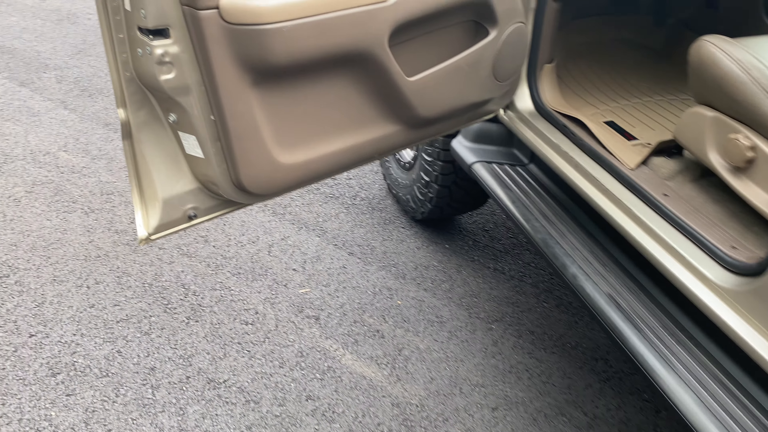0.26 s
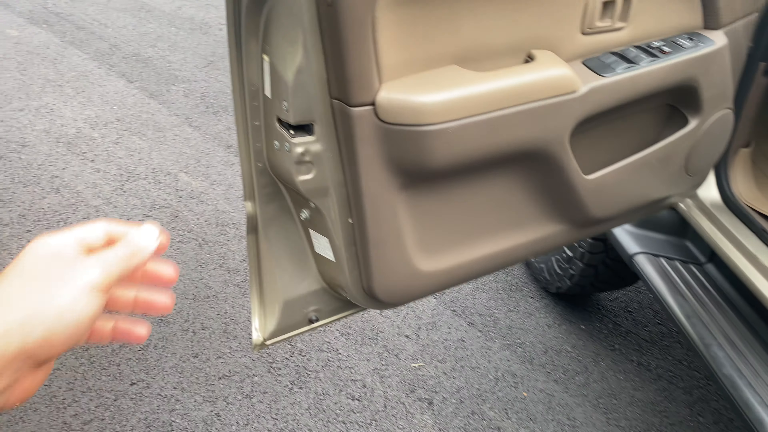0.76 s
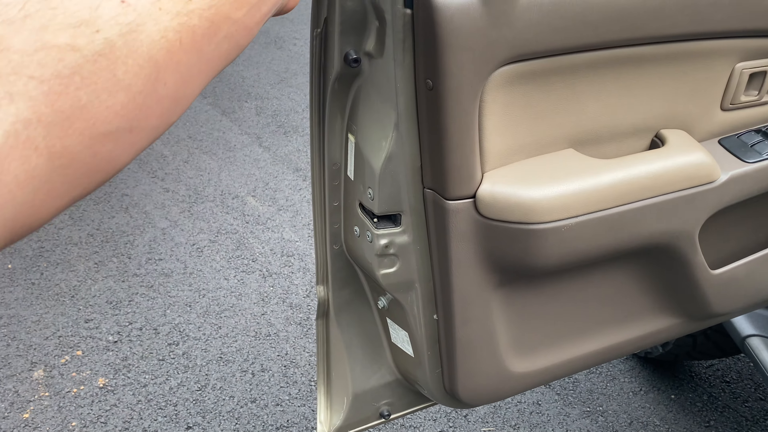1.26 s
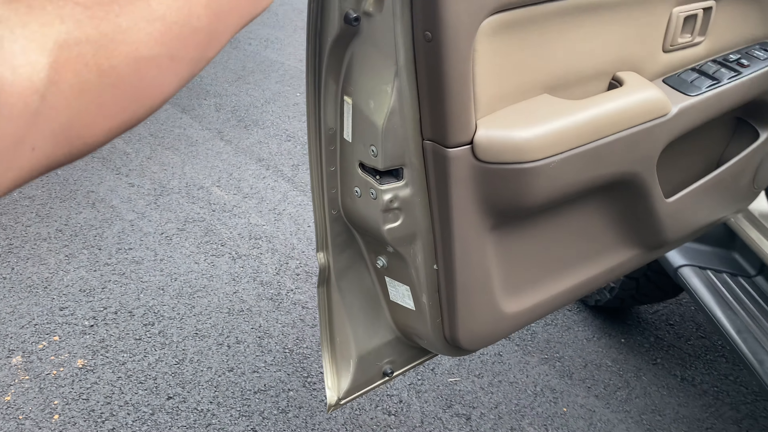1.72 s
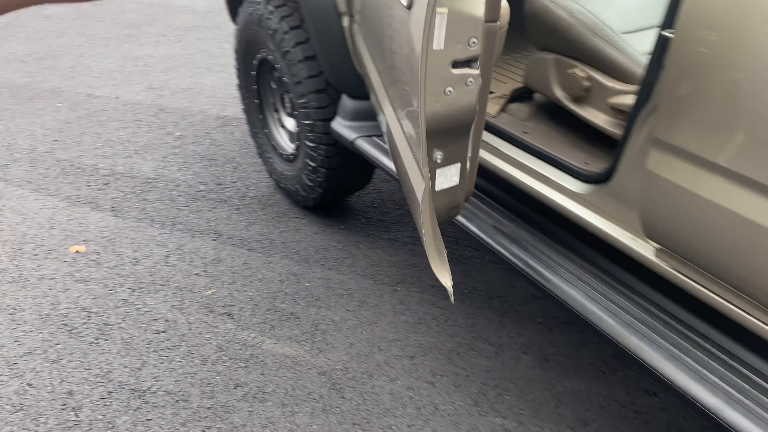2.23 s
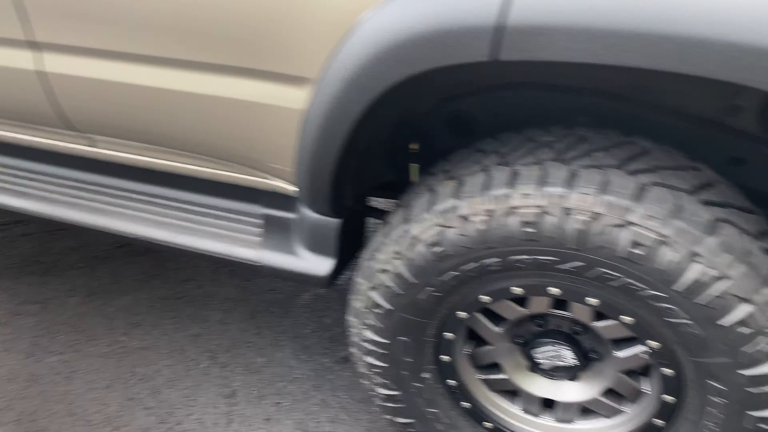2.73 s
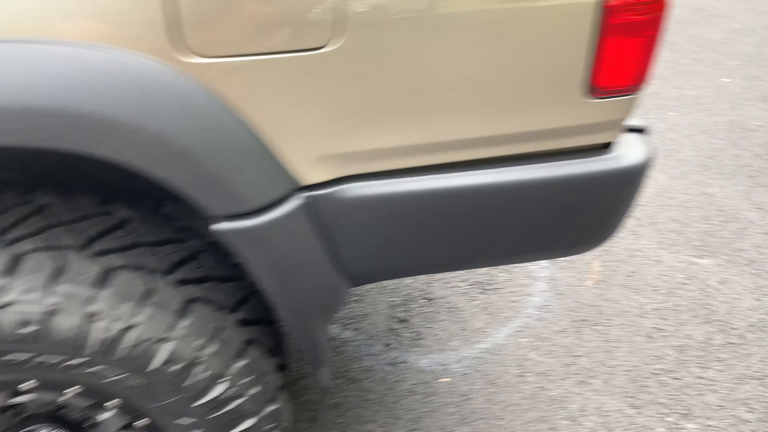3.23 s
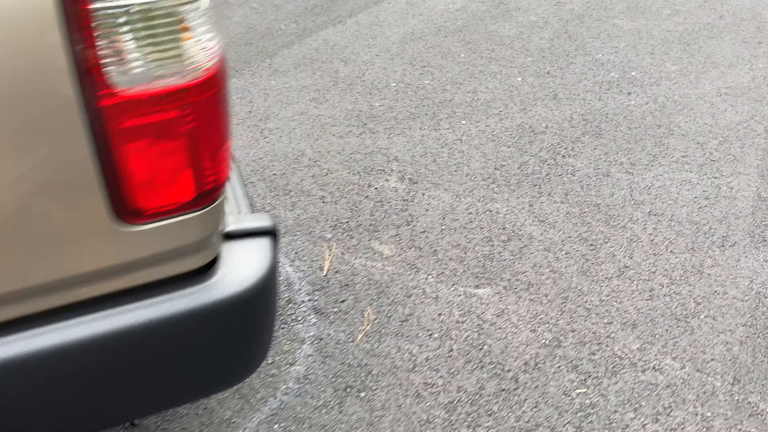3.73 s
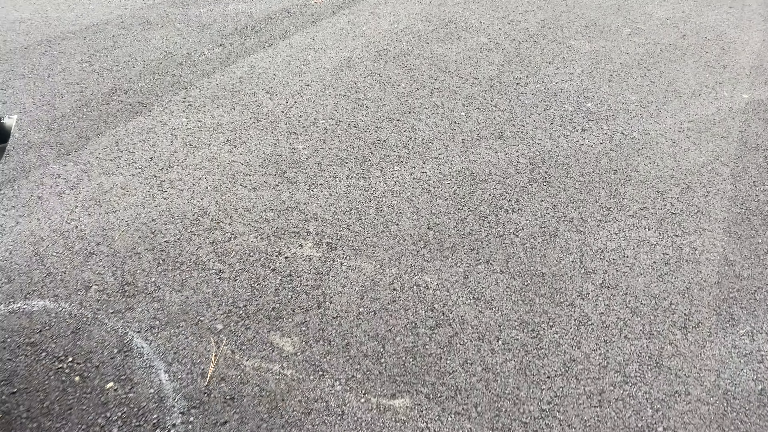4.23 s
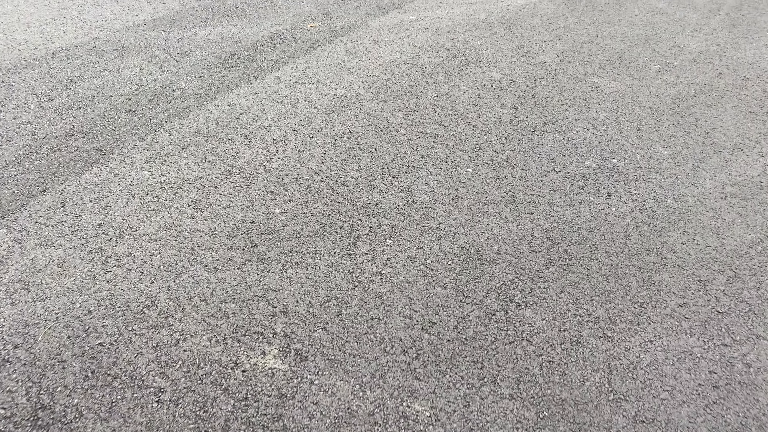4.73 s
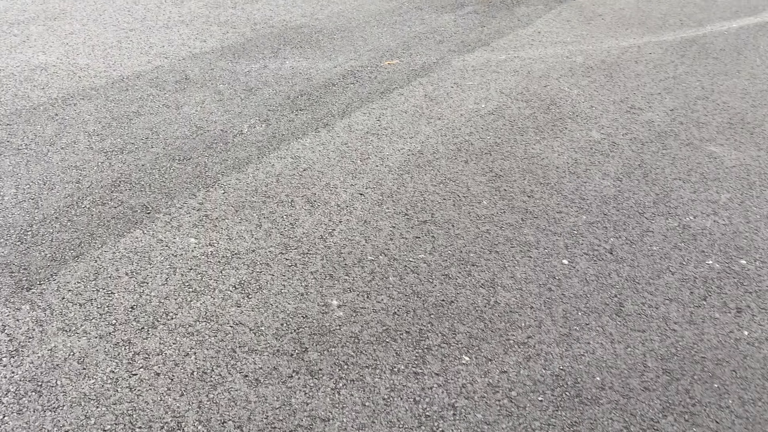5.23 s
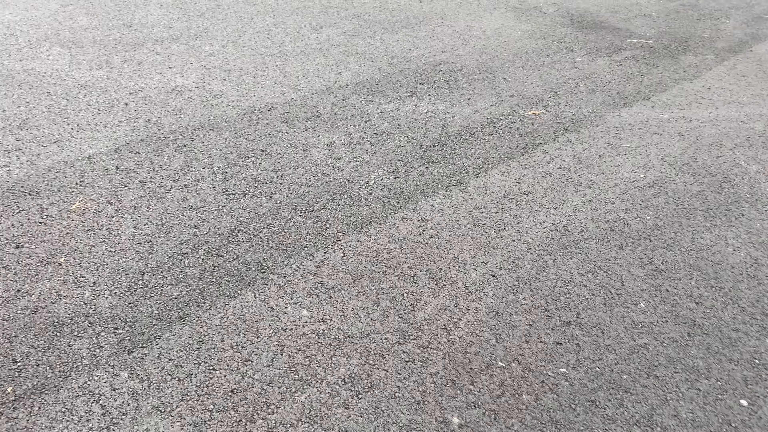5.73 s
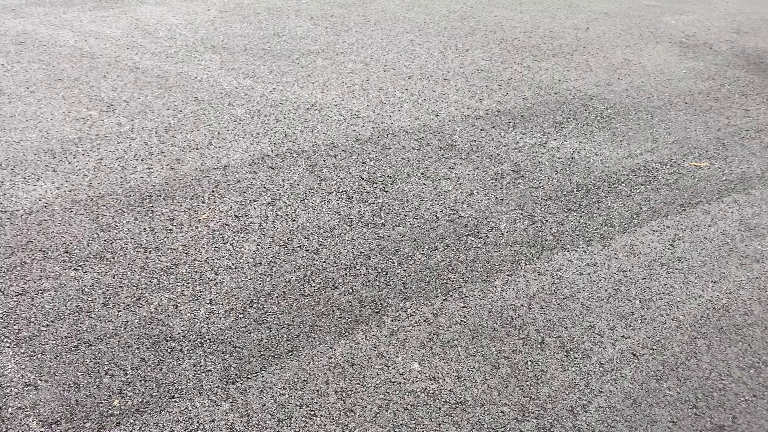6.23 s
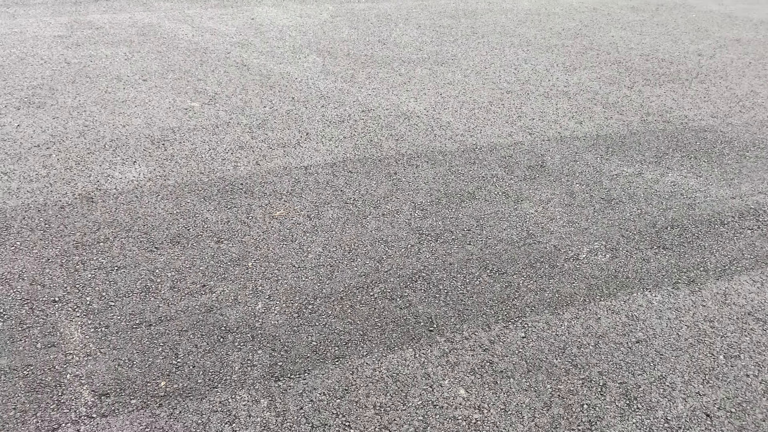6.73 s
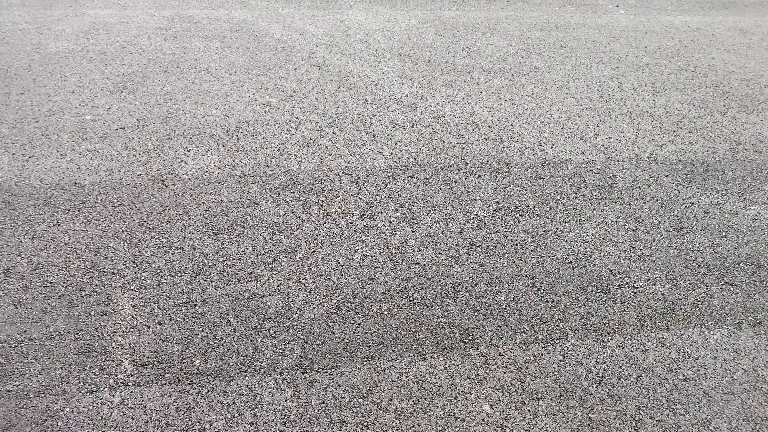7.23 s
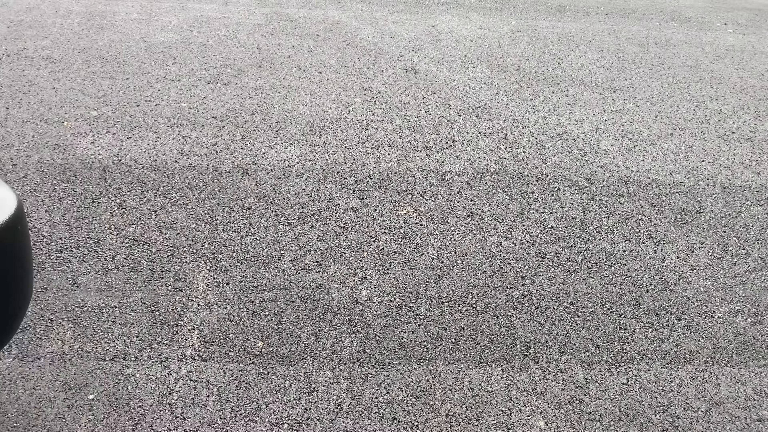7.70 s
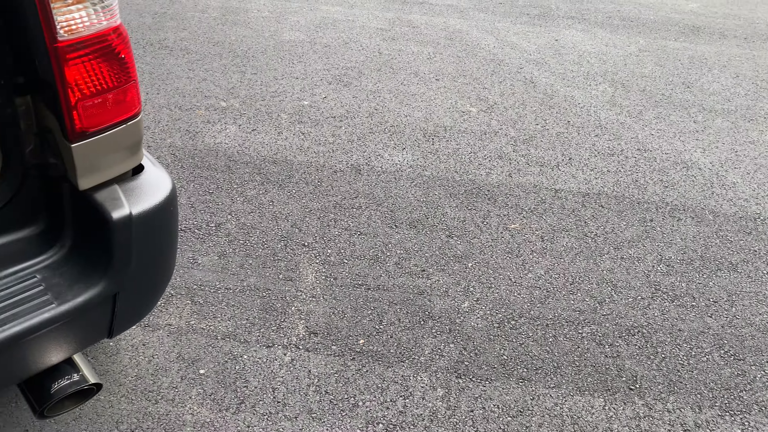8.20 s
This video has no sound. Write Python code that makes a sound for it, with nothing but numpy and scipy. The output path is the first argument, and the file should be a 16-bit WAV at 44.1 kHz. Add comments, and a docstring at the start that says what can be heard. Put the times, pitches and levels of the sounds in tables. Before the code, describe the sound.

A walk around an off-road vehicle on quiet asphalt. First comes a strong door slam with a deep cabin thump and short panel ring, then tiny hinge creaks and a softer, duller door closing. Gusts rumble on the nearby stereo microphones during a pause with faint scuffing steps. A crisp, bright latch clack follows, then small rattly knocks, over low breeze and distant air noise.

```python
"""A walk around a parked off-road car on a quiet drive, with a pair of microphones in the open air.
Throughout, a breeze rumbles and flutters as shaped noise over a faint hush and a distant machine hum.
First one door slams; then the front door's hinge creaks and it is swung shut; last, after a few shoe scuffs,
the tailgate latch pops and the gate knocks as it lifts. Each is a quick run of contacts that ring decaying
sines and noisy clatter; short noise bursts make snaps and scuffs, low sines the cabin thumps."""
import sys
import numpy as np
from scipy import signal
from scipy.fft import rfft, irfft, next_fast_len
from scipy.io import wavfile
from scipy.ndimage import uniform_filter1d, map_coordinates

SR = 44100
rng = np.random.default_rng(int(sys.argv[2]) if len(sys.argv) > 2 else 0)


def file_out(sig):
    """Save sig as 16-bit WAV at sys.argv[1]."""
    # one column per channel
    cols = np.atleast_2d(sig).T
    # limit, then scale
    lim = np.clip(cols, -1, 1)
    pcm = np.round(lim * 32767).astype(np.int16)
    wavfile.write(sys.argv[1], SR, pcm)


N = 373086
RING = np.arange(SR // 2) / SR  # time axis of one blow, in seconds
CONTACT_RISE_S = .001  # time constant of a contact's build-up

# how long the tailgate's clatter lasts, before each contact's length share: pitch_hz, t60_s
TAILGATE_DECAY = [(250, 0.17), (1000, 0.11), (4000, .11), (12000, 0.042)]
# how alike the tailgate's clatter is at both microphones: pitch_hz, left_right_likeness (-1 to 1)
TAILGATE_ALIKE = [(150, .8), (500, 0.9), (1500, 0.51), (4000, .45), (10000, -0.024)]


def amp(db):
    """Decibels to gain."""
    return 10 ** (np.asarray(db) / 20)


def unit(x):
    """Scaled to rms 1."""
    return x / np.sqrt(np.mean(x ** 2) + 1e-20)


def along(points, hz):
    """(Hz, value) points read on a log frequency axis."""
    point_hz, values = np.transpose(points)
    return np.interp(np.log(hz + 1), np.log(point_hz + 1), values)


def curves(rows):
    """One value per sample for each column after the time."""
    times, *columns = np.transpose(rows)
    return [np.interp(np.arange(N) / SR, times, column) for column in columns]


def add(track, s, sound):
    """Lay a sound into the track at time s, cut at the track's end."""
    room = track[:, round(s * SR):][:, :sound.shape[-1]]
    room += sound[..., :room.shape[-1]]


def pan(left_db):
    """Gains of both channels for a left-over-right level difference."""
    return amp([[left_db / 2], [-left_db / 2]])


def fade(t60, rise):
    """Envelope of one blow: a quick build-up and an exponential decay, both in seconds."""
    decay = 1000 ** (-RING / max(t60, 1e-3))
    build_up = 1 - np.exp(-RING / max(rise, 1e-5))
    return decay * build_up


def noise(colour_db, alike, size):
    """Stereo noise of rms 1 with a given spectrum and left-right likeness."""
    m = next_fast_len(size)
    hz = np.fft.rfftfreq(m, 1 / SR)
    # the balance of mid and side sets the correlation of left and right
    turn = np.arccos(np.clip(along(alike, hz), -1, 1)) / 2
    spectra = rfft(rng.standard_normal((2, m))) * amp(colour_db(hz))
    mid, side = irfft(spectra * [np.cos(turn), np.sin(turn)], m)[:, :size]
    return unit(np.array([mid + side, mid - side]))


def even(x, seconds):
    """Noise with its slow chance swells levelled out."""
    power = uniform_filter1d(np.mean(x ** 2, axis=0), max(round(seconds * SR), 1))
    return x / np.sqrt(np.abs(power) + .02)


def wobble(rate):
    """A smooth random curve, rate knots a second."""
    return map_coordinates(rng.standard_normal(size=512), [np.arange(N) * rate / SR], mode="mirror")


def die_away(x, decay, length, rise):
    """Each octave of x fades at its own speed, its t60 multiplied by length."""
    hz = np.fft.rfftfreq(len(RING), 1 / SR)
    centres = np.geomspace(125, 16000, 8)
    spectrum = rfft(x)
    out = 0
    for centre, one in zip(centres, np.eye(len(centres))):
        share = along(np.c_[centres, one], hz)  # overlapping octave bands that sum to one
        band = irfft(spectrum * share, len(RING))
        out = out + band * fade(along(decay, centre) * length, rise)
    return out


def bursts(rows, alike, rise):
    """Short noise rings, each around one pitch: (s, dB, Hz, width in octaves, t60 s)."""
    out = np.zeros((2, N))
    for s, db, centre_hz, width, t60 in rows:
        octaves = lambda hz: np.log2((hz + 1) / centre_hz)
        band_db = lambda hz: -20 * np.log10(1 + (octaves(hz) / width) ** 2) - 2 * octaves(hz) ** 2
        ring = noise(band_db, alike, size=len(RING))
        add(out, s, amp(db) * ring * fade(t60, rise))
    return out


def hush():
    """Far traffic and leaf hiss: one noise colour, parted low and high at a crossover."""
    # slow levels of both layers before their weights: at_s, far_traffic_db, leaf_hiss_db
    levels = [(0.0, -69.5, -72), (1.58, -71, -72.5), (2.73, -68, -71.5), (3.98, -68, -73), (5.28, -69, -73),
              (6.46, -67, -72), (6.76, -68.5, -73), (8.46, -67, -74)]
    # colour of the open air, before the crossover: pitch_hz, level_db_per_hz
    air_colour = [(100, -12.5), (170, -2.5), (198, -3), (235, -1), (263, -4.5), (289, -5.5), (360, -9.5),
                  (464, -10), (745, -10), (1090, -9.5), (1150, -9.5), (1240, -12), (1560, -13),
                  (10800, -25.5), (14600, -34), (15700, -35.5)]
    # how alike the air is at both microphones: pitch_hz, left_right_likeness
    air_alike = [(60, 0.78), (150, 0.25), (380, 0.62), (950, 0.68), (2380, 0.49), (5980, 0.32),
                 (15000, 0.2)]
    traffic_weight_db, leaves_weight_db = 2.5, 2
    crossover_hz = 2700
    cut_db = lambda ratio: -10 * np.log10(1 + ratio ** 4)
    low_db = lambda hz: along(air_colour, hz) + cut_db(hz / crossover_hz)
    high_db = lambda hz: along(air_colour, hz) + cut_db(crossover_hz / (hz + 1))
    traffic_db, leaves_db = curves(levels)
    traffic = amp(traffic_db + traffic_weight_db) * noise(low_db, air_alike, size=N)
    leaves = amp(leaves_db + leaves_weight_db) * noise(high_db, air_alike, size=N)
    return pan(1.0) * traffic + pan(0.64) * leaves


def hum():
    """A distant machine's unsteady lines: noise in narrow resonance-shaped peaks."""
    # slow level of the whole hum: at_s, level_db
    levels = [(0, -73.5), (1.2, -67), (3.3, -67.5), (4.5, -73.5), (5.5, -70.5), (8.46, -78.5)]
    # lines of the machine, levels relative to one another: pitch_hz, level_db, width_hz
    lines = [(114.8, 2, 6.6), (240.9, -3, 5), (299.4, -9.5, 10), (1160, -15, 7)]
    peak = lambda hz, c, db, width: amp(db) / np.sqrt(width) / (1 + (2 * (hz - c) / width) ** 2)
    lines_db = lambda hz: 20 * np.log10(sum(peak(hz, *line) for line in lines))
    steady = even(noise(lines_db, [(100, 0.76)], size=N), seconds=0.61)
    return amp(curves(levels)[0]) * steady


def breeze():
    """Gusts swell and drop over the draught, buffeting the microphones and fluttering in lumps at their ports."""
    # light air that never stops, before its wander: at_s, buffet_db, flutter_db
    draught = [(0, -50.5, -66.5), (1.4, -49.5, -67), (3.4, -52, -60.5), (4.5, -49, -62.5), (6.6, -45, -60),
               (8.46, -44, -62)]
    # gusts on the microphones, flutter before its lumps:
    # peak_s, buffet_db, half_length_s, flutter_db (against the buffet)
    gusts = [(0.877, -46, 0.059, -19), (2.1, -44, 0.28, -19), (4.87, -38.5, 0.1, -24),
             (5.306, -33, .06, -37), (5.49, -33.5, .1, -15.5), (5.838, -30, .11, -18.5),
             (6.14, -40.5, 0.063, -12), (7.24, -39.5, 0.13, -15.5), (7.943, -37, 0.085, -17.5)]
    # colour of the low rumble: pitch_hz, level_db_per_hz
    buffet_colour = [(3, -11), (8, 3), (20, -3.5), (30, -15.5), (50, -18.5), (90, -30), (180, -83)]
    # colour of the flutter above it: pitch_hz, level_db_per_hz
    flutter_colour = [(35, -9.5), (60, -6.5), (85, -5.5), (130, -11.5), (200, -23.5), (350, -38.5),
                      (700, -73)]
    lumps_per_s, lump_db = 18, 3  # how fast and how deeply a gust's flutter wavers
    wander_per_s, wander_db = 4, 1.5  # how fast and how deeply the draught swells by itself
    draught_db = curves(draught) + wander_db * wobble(wander_per_s)
    buffet_power, flutter_power = amp(draught_db) ** 2
    lumps_db = lump_db * wobble(lumps_per_s)
    t = np.arange(N) / SR
    for s, gust_db, half_length, flutter_db in gusts:
        swell = np.exp(-((t - s) / half_length) ** 2)
        buffet_power = buffet_power + amp(gust_db) ** 2 * swell
        flutter_power = flutter_power + amp(gust_db + flutter_db + lumps_db) ** 2 * swell
    buffet = even(noise(lambda hz: along(buffet_colour, hz), [(30, 0.88)], size=N), seconds=.3)
    flutter = noise(lambda hz: along(flutter_colour, hz), [(80, 0.67)], size=N)
    return np.sqrt(buffet_power) * buffet + np.sqrt(flutter_power) * flutter


def rattle(depth_db):
    """Loose parts chatter: a gain running between random knots about a millisecond apart."""
    knots = rng.standard_normal(len(RING) // 48 + 2)
    places = np.linspace(0, len(knots) - 1, len(RING))
    return unit(amp(depth_db * np.interp(places, np.arange(len(knots)), knots)))


def panel(contacts, modes, colour, decay, alike, ring_db, ring_left_db, clatter_left_db, lead, scatter, rattle_db):
    """Each contact rings the panel's modes and a dense clatter of steel and trim; lead and scatter in radians."""
    out = np.zeros((2, N))
    for s, blow_db, clatter_db, bright_db, length in contacts:
        ring = np.zeros((2, len(RING)))
        for (hz, db, t60), (size, slip) in zip(modes, rng.standard_normal((len(modes), 2))):
            # long waves reach both microphones alike, shorter ones favour the near one
            shade = min(hz / 250, 1)
            # a new contact feeds the swing already there, a little out of step
            ear_lead = shade * lead * np.array([[.5], [-.5]])
            phase = 2 * np.pi * hz * (s + RING) + scatter * slip + ear_lead
            # a soft contact hardly wakes the high modes
            soft_db = min(bright_db, 0) * max(np.log2(hz / 500), 0)
            gain = pan(shade ** 2 * ring_left_db) * amp(db + soft_db + size)
            ring += gain * np.sin(phase) * fade(t60, CONTACT_RISE_S)
        clatter_colour = lambda hz: along(colour, hz) + bright_db * np.log2(hz + 100)
        hiss = rattle(rattle_db) * noise(clatter_colour, alike, size=len(RING))
        clatter = die_away(hiss, decay, length, CONTACT_RISE_S)
        blow = amp(blow_db + ring_db) * ring
        add(out, s, blow + amp(clatter_db) * pan(clatter_left_db) * clatter)
    return out


def slam():
    """The first door slams: latch, frame and trim contacts ring its panel."""
    # contacts, ring before ring_db: start_s, ring_db, clatter_db, brightness_db_per_octave, length_share
    contacts = [(.1728, -36, -39.5, 1.5, 0.61), (.1855, -26, -26, 1.5, 0.89), (.1995, -37, -48, -12, .83),
                (.213, -39, -35, 0, 0.97), (.222, -47, -52, 3, .4), (.232, -45, -44.5, 2, 0.81),
                (.2493, -60, -42, 1, .47), (.2645, -45, -44, -3.5, .54)]
    # panel modes, before a random size per contact: pitch_hz, level_db, t60_s
    modes = [(57.5, 1, 0.26), (78, -9, .25), (99, -8, 0.39), (120.7, -2.5, 0.24), (146, -2, 0.21),
             (209, -4, 0.21), (268, -13.5, 0.31), (300, -8, 0.22), (330, -3, 0.1), (380, -5, 0.12),
             (419, -7.5, 0.144), (496, -12, 0.12), (660, -17, 0.16), (813, -17, 0.15), (960, -12, 0.15),
             (1035, -13, .14), (1116, -11, 0.12), (1377, -13.5, 0.13), (1560, -5.5, 0.06), (1772, -17, .14)]
    # clatter of steel and trim, before brightness: pitch_hz, level_db_per_hz
    colour = [(120, -18), (200, 3), (378, -3), (690, -16.5), (755, -5.5), (1130, -7.5), (1560, -15.5),
              (1950, -22.5), (2510, -15.5), (3180, -25.5), (3820, -23), (5800, -29.5), (10400, -32),
              (15500, -46)]
    # clatter decay, before length_share: pitch_hz, t60_s
    decay = [(250, 0.27), (1000, 0.15), (4000, 0.15), (12000, .11)]
    # clatter at both microphones: pitch_hz, left_right_likeness
    alike = [(150, 0.54), (500, 0), (1500, 0.21), (4000, 0.043), (10000, 0)]
    return panel(contacts, modes, colour, decay, alike, ring_db=-4.5, ring_left_db=7.0,
                 clatter_left_db=4.0, lead=0.58, scatter=0.81, rattle_db=4)


def snaps():
    """Sharp snaps of latch and hinge metal: noise bursts with a very fast rise."""
    # snaps, before panning and fading: start_s, level_db, pitch_hz, width_octaves, t60_s
    metal = [(.188, -25.5, 1290, 0.28, .026), (.1868, -37, 4560, .32, .03),
             (1.6835, -48, 11800, .35, .0088), (2.203, -48.5, 10940, .036, 0.062),
             (2.208, -53, 12000, .08, .039), (6.3968, -24.5, 4180, .071, 0.019),
             (6.3968, -26, 5830, .25, 0.018), (6.302, -50.5, 1170, .22, 0.068),
             (7.277, -45, 5200, 0.23, .044), (7.387, -52, 3050, 0.28, 0.048)]
    return pan(2.0) * bursts(metal, [(1500, 0.29), (12000, 0.29)], rise=0.00036)


def cabin():
    """A closing door pumps the cabin air, which swings a few times as a low decaying sine."""
    # squeezes of the air, before fading: start_s, level_db, pitch_hz, rise_s, t60_s
    thumps = [(.190, -18.5, 27.6, 0.013, 0.4), (2.636, -31.5, 24.8, 0.0085, 0.23)]
    out = np.zeros((2, N))
    for s, db, hz, rise, t60 in thumps:
        add(out, s, amp(db) * np.sin(2 * np.pi * hz * RING) * fade(t60, rise))
    return out


def footsteps():
    """Shoes scuff the asphalt: broad noise bursts."""
    # scuffs, before fading: start_s, level_db, pitch_hz, width_octaves, t60_s
    scuffs = [(.770, -63, 1800, 1.3, .25), (5.672, -55, 1400, 1.4, 0.07), (5.675, -52, 302, 1.2, 0.13),
              (6.035, -59, 1500, 1.5, 0.16)]
    return bursts(scuffs, [(1000, 0.2)], rise=0.0013)


def hinge():
    """The front door's hinge slips a few times, every slip ringing alike, and sings thinly."""
    # slips as the door starts to swing, before fading: start_s, level_db
    creaks = [(2.039, -60), (2.16, -53), (2.173, -50.5)]
    # thin singing, before fading: start_s, level_db, pitch_hz, width_octaves, t60_s
    squeak = [(2.11, -70, 7700, .012, 0.43)]
    creak_hz, creak_octaves, creak_t60_s = 1840, 0.44, 0.042
    slips = [(s, db, creak_hz, creak_octaves, creak_t60_s) for s, db in creaks]
    creaking = bursts(slips, [(1500, .29)], rise=.0004)
    return creaking + bursts(squeak, [(8000, .3)], rise=0.033)


def shut():
    """The front door is swung shut: a softer run of contacts on its panel."""
    # contacts, ring before ring_db: start_s, ring_db, clatter_db, brightness_db_per_octave, length_share
    contacts = [(2.6155, -54, -46, -.5, .7), (2.6235, -64, -47, -2, 1.5), (2.63, -41, -36.5, 1.5, 1.04),
                (2.6395, -46.5, -43.5, 4, .8), (2.6585, -37, -38, -.5, 0.73), (2.7005, -51, -53, 3, 0.46)]
    # panel modes, before a random size per contact: pitch_hz, level_db, t60_s
    modes = [(49, 0.5, 0.18), (75, -2, 0.21), (115.7, -5, 0.18), (180.6, -12, 0.22), (296, -5.5, 0.071),
             (334, -10, 0.053), (397, -13, 0.1), (454, -5, 0.076), (597, -13, 0.068), (815, -18, .1)]
    # clatter of steel and trim, before brightness: pitch_hz, level_db_per_hz
    colour = [(120, -41), (200, -14), (315, -5.5), (534, -6.5), (653, -23), (812, -12.5), (890, -18.5),
              (974, -16.5), (1170, -19.5), (2510, -25), (6830, -26.5), (15500, -40)]
    # clatter decay, before length_share: pitch_hz, t60_s
    decay = [(250, 0.22), (1000, 0.17), (4000, .11), (12000, 0.049)]
    # clatter at both microphones: pitch_hz, left_right_likeness
    alike = [(150, .4), (500, -0.14), (1500, -.45), (4000, -0.63), (10000, -0.11)]
    return panel(contacts, modes, colour, decay, alike, ring_db=-1, ring_left_db=-12.5,
                 clatter_left_db=-1.5, lead=-2.85, scatter=0.7, rattle_db=1.5)


def gate():
    """The tailgate latch pops: its contacts ring the gate's panel."""
    # contacts, ring before ring_db: start_s, ring_db, clatter_db, brightness_db_per_octave, length_share
    contacts = [(6.2745, -51.5, -66, 0, .8), (6.299, -47, -49.5, 2, .55), (6.3922, -25, -46, 2, 1.2),
                (6.3975, -26.5, -29, 1, 0.84), (6.404, -26.5, -32.5, 2.5, 0.64), (6.4128, -35, -46, -19, 1),
                (6.4195, -41, -41, -4.5, 1.26), (6.4325, -39, -49.5, 0, 0.94)]
    # panel modes, before a random size per contact: pitch_hz, level_db, t60_s
    modes = [(60, -17.5, 0.36), (115.6, -10.5, 0.162), (197.4, -4.5, 0.072), (268, -11.5, 0.13),
             (338, -8.5, 0.14), (420, 4, 0.058), (594, -1.5, 0.064), (640, -8.5, 0.095), (946, -16, 0.11),
             (1077, -10, 0.056), (1277, -18, 0.072), (1620, -21, .1), (2280, -21, .06), (3040, -16, 0.054),
             (4160, -14, .05)]
    # clatter of steel and trim, before brightness: pitch_hz, level_db_per_hz
    colour = [(150, -31), (280, -17), (420, -5), (620, -7), (780, -4.5), (1150, -6), (2100, -12),
              (3200, -16), (4700, -16.5), (6000, -19), (9700, -22), (15500, -27)]
    return panel(contacts, modes, colour, TAILGATE_DECAY, TAILGATE_ALIKE, ring_db=-5, ring_left_db=7,
                 clatter_left_db=7.5, lead=0.84, scatter=1.0, rattle_db=-1)


def lift():
    """The gate knocks as it lifts: light contacts ringing a few modes."""
    # contacts, ring before ring_db: start_s, ring_db, clatter_db, brightness_db_per_octave, length_share
    contacts = [(7.276, -63, -45, 1.5, .93), (7.2915, -49, -58, -11, .8), (7.337, -66, -62, -3, 1.5),
                (7.37, -54, -53, -2, 1.5), (7.387, -53, -43.5, -3.5, .7), (7.402, -66, -55, 0, .98)]
    # panel modes, before a random size per contact: pitch_hz, level_db, t60_s
    modes = [(420, -1, 0.092), (626, 6.5, 0.06), (880, -1, 0.12), (1352, -5, 0.077)]
    # clatter of steel and trim, before brightness: pitch_hz, level_db_per_hz
    colour = [(150, -31), (250, -17.5), (385, -5.5), (1200, -9), (1430, -5), (1640, -11.5), (1950, -10),
              (3390, -24), (6210, -17), (6880, -39), (9390, -19), (15500, -31)]
    return panel(contacts, modes, colour, TAILGATE_DECAY, TAILGATE_ALIKE, ring_db=-2.5, ring_left_db=-3.0,
                 clatter_left_db=1.0, lead=.1, scatter=0.62, rattle_db=-0.5)


def yard(x, wall_delay, wall_db):
    """Trees return a faint diffuse tail, a house front one later, smeared echo."""
    # decay of the tail, before its length factor: pitch_hz, t60_s
    tail_decay = [(150, 0.55), (1000, 0.42), (4000, 0.2), (12000, 0.17)]
    # colour of what comes back: pitch_hz, level_db
    echo_colour = [(100, -13), (250, -5.5), (600, -1.5), (1500, -7), (5000, -10), (12000, -30)]
    wash = lambda: noise(lambda hz: along(echo_colour, hz), [(100, 0.5)], size=len(RING))
    tail = die_away(wash(), tail_decay, 0.74, rise=0.032)
    wall = amp(wall_db) * wash() * fade(0.14, rise=.004)
    add(tail, wall_delay, wall)
    return signal.fftconvolve(x, tail / np.linalg.norm(tail[0]), axes=1)[:, :N]


def scene():
    """The car and footsteps with their faint echo, in the open air."""
    car = slam() + snaps() + cabin() + hinge() + shut() + gate() + lift()
    near = car + footsteps()
    echo = amp(-35.0) * yard(near, wall_delay=0.078, wall_db=-3)
    return near + echo + breeze() + hush() + hum()


def record(dry):
    """The recorder keeps nothing above its band limit."""
    top_hz = 15800
    m = next_fast_len(N + SR // 2)
    kept = np.fft.rfftfreq(m, 1 / SR) < top_hz
    return irfft(rfft(dry, m) * kept, m)[:, :N]


dry = scene()
out = record(dry)
file_out(out)
```